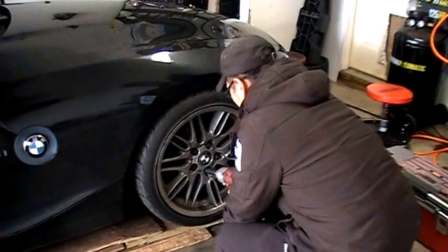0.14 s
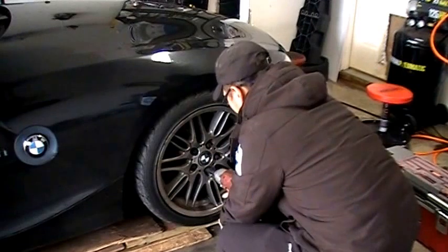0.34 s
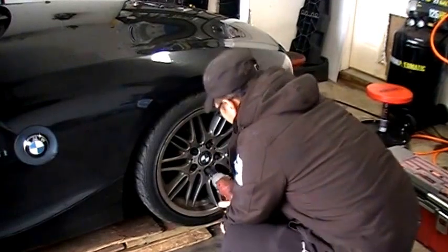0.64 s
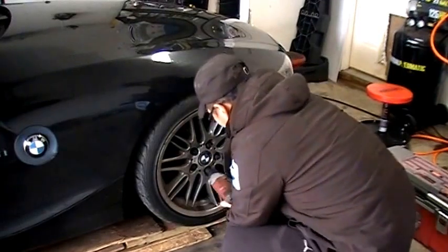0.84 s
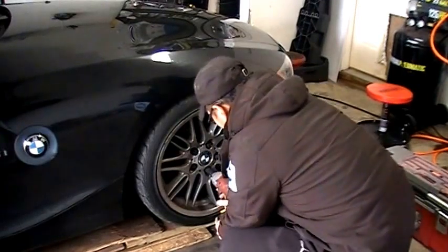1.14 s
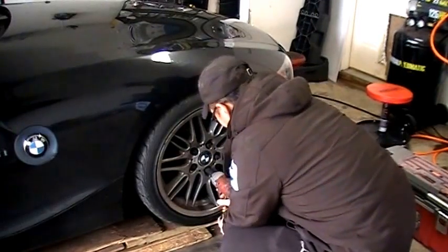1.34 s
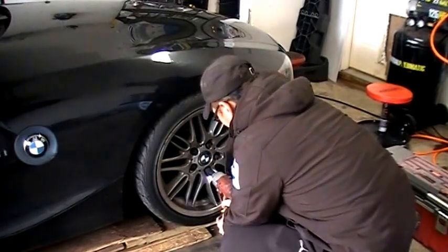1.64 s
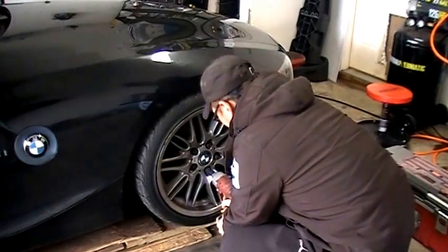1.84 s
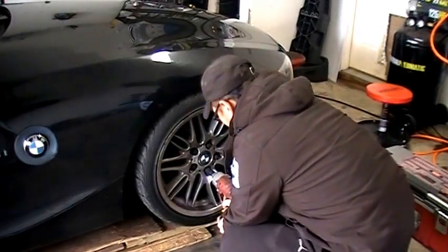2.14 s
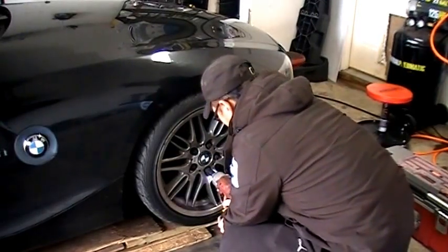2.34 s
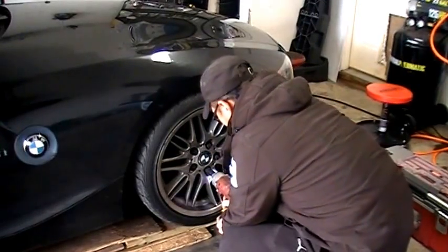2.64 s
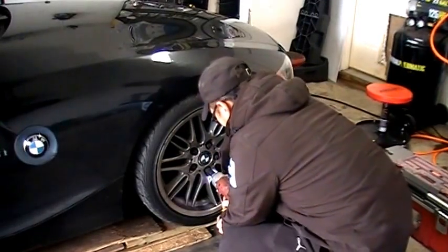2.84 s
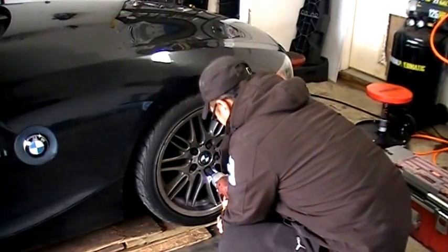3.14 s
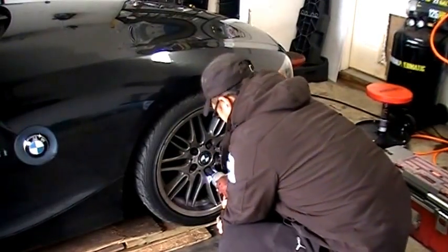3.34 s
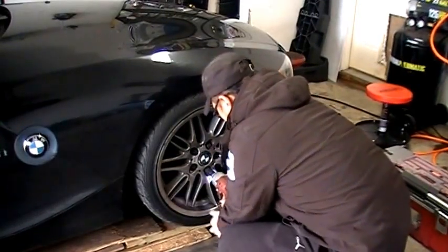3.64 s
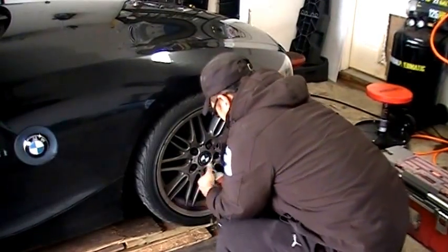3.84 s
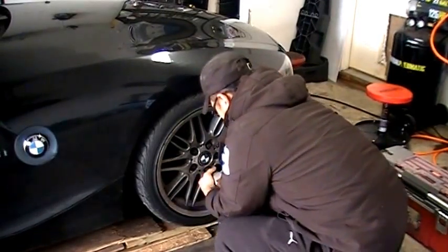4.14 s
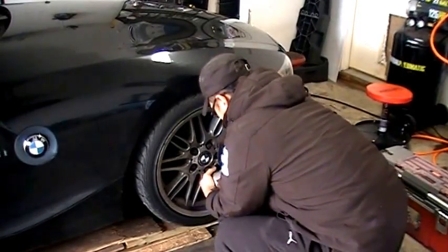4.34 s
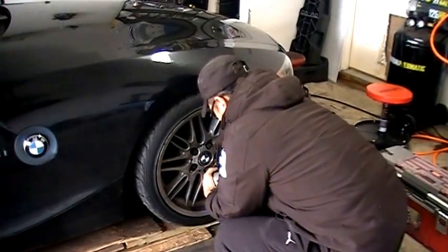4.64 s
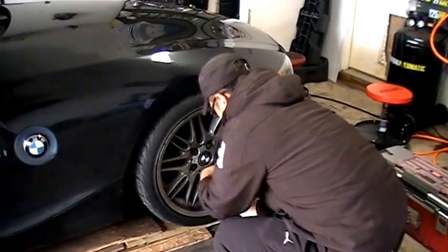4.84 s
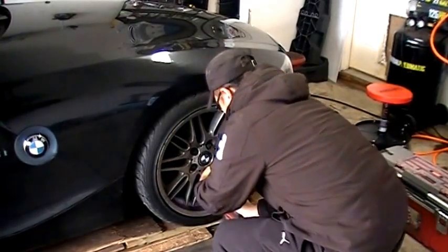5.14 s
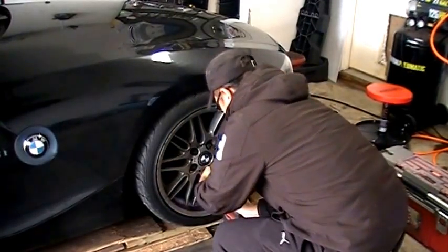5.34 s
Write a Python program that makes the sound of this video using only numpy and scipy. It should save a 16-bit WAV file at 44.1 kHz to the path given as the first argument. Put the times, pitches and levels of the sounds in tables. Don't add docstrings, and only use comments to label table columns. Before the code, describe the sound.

Small metallic knocks come first, in two clusters, followed by grainy jacket rustles and near quiet. Then a brief electric whistle leads into the harsh, continuous chatter of an impact wrench, about thirty-eight blows a second, with gear whirr and ringing wheel metal. The tool is close, echoing off the floor and car body with a short garage reverberation, captured in stereo by a microphone with automatic gain.

```python
import sys
import numpy as np
from scipy import signal
from scipy.fft import rfft, irfft, next_fast_len
from scipy.io import wavfile
from scipy.ndimage import map_coordinates

SR = 44100
rng = np.random.default_rng(int(sys.argv[2]) if len(sys.argv) > 2 else 0)


def file_out(sig):
    cols = np.atleast_2d(sig).T
    lim = np.clip(cols, -1, 1)
    pcm = np.round(lim * 32767).astype(np.int16)
    wavfile.write(sys.argv[1], SR, pcm)


def voltage_ratio(decibels):
    exponent = np.asarray(decibels, float) / 20
    return 10 ** exponent


N = 242991

# (time [s], crack [dB], wheel ring [dB], brightness [dB])
FIRST_BLOWS = [(1.5489, -6.5, -14, -1), (1.5826, -11, -14, 7), (1.6127, -15, -24, 14),
               (1.6381, -7.5, -22, -1.5), (1.6612, -9, -38, -2), (1.6831, -10.5, -14.5, 3),
               (1.7072, -10.5, -24, 3)]
# (time [s], blows struck so far [count])
BLOW_COUNT = [(1.7276, 7), (1.827, 11), (1.956, 16), (2.1611, 24), (2.5782, 40), (3.0473, 58), (3.2575, 66),
              (3.5209, 76), (3.9401, 92), (4.3577, 108), (4.7799, 124), (5.0142, 133), (5.4952, 151)]
# (time [s], level [dB])
FORCE = [(1.6, 2), (2.2, 1.5), (2.4, -1.7), (2.75, 1.1), (3.1, 0), (3.6, 0.2), (4.2, -0.3), (4.8, 0.3),
         (5.51, -0.45)]
# (time [s], level [dB])
GRIP = [(1.7, 1.5), (2.2, 0.5), (2.4, -2), (2.75, 0.5), (3.35, -0.6), (3.55, -3), (4.3, -0.5), (4.85, 3.5),
        (4.91, -5.5), (5.51, -4)]
# (blows per cycle [count], start [cycles], brightness [dB])
TONE_CYCLES = [(6.734, .14, 2.6), (7.53, -.41, 2.2)]
# (time [s], extra level [dB])
SQUARE_BLOWS = [(1.9293, 1.5), (1.9567, -1), (2.2632, 2.6), (2.3422, 1.8), (2.369, 1.8), (2.4469, 4),
                (2.5251, 3.2), (2.5786, 1), (2.629, 1.6), (2.709, 2.5), (3.073, 2), (3.2048, 3.5),
                (3.3096, 3.5), (3.5734, 3), (4.0172, 1), (4.0958, 3), (4.4627, 2), (4.5405, 1),
                (4.8325, 1.5), (4.882, 3), (4.9349, 1.8), (5.0143, 4), (5.0942, 2.5), (5.307, 1)]
# (frequency [Hz], level per Hz [dB])
CRACK_COLOUR = [(180, -10.5), (300, -18.5), (478, -20), (644, -15.5), (723, -17), (928, -22.5),
                (1930, -5.5), (2470, -7), (4810, -1.5), (10300, -14.5), (15900, -45)]

# (frequency [Hz], width [Hz], level [dB])
WHEEL = [(2353, 15, -23), (2708, 31, -5), (2870, 19, -14.5), (3206, 12, -18), (4310, 49, -17),
         (4810, 30, -3.5)]
# (frequency [Hz], width [Hz], level [dB])
SPOKES = [(1638, 29, -13), (1900, 23, -10), (1854, 185, -7), (1914, 23, -4), (2160, 65, -11.5)]
# (frequency [Hz], width [Hz], level [dB])
BARREL = [(657, 10, -1.5), (1126, 16, -6.5)]
# (time [s], level [dB])
BARREL_FREEDOM = [(1.5, 5), (1.7, 5.5), (2.2, 2), (2.7, 1), (3, 0.5), (3.4, 0), (3.8, 1.5), (4.2, -2.5),
                  (4.55, 5.5), (4.9, -10), (5.2, 1.5), (5.51, -4)]

# (frequency [Hz], level per Hz [dB])
WHIRR_COLOUR = [(59, -50), (100, -40), (153, -13.5), (460, -7), (646, -3.5), (927, -2.5), (1910, 3),
                (3450, -3), (4740, -2), (10400, -11.5), (15900, -37)]
# (frequency [Hz], width [Hz], level [dB])
SOCKET_TONES = [(1928, 18, -1), (4635, 60, -5), (4781, 30, -2), (4812, 16, 2)]
# (time [s], level [dB])
BODY_HUM = [(1.54, -127), (1.6, -57), (2.3, -50), (2.8, -49.5), (2.9, -43), (3.6, -45), (4.1, -48),
            (4.8, -39.5), (4.95, -50.5), (5.51, -49)]
# (multiple of the blow rate [ratio], level [dB])
SHAFT_TONES = [(3, -6), (4, 0), (5, -16), (6, -7), (11, -10), (14, -12)]
# (time [s], frequency [Hz], level [dB], length [s])
GROANS = [
    (1.545, 1500, -33, 0.0076),
    (1.576, 970, -19.5, 0.0037),
]

# (time [s], peak [dB], thud [dB], tick [dB])
KNOCKS = [(0.0004, -42, 8, -18), (0.0159, -22.5, -9, -4.5), (0.0129, -17, -11, -18),
          (0.0201, -29.5, 1, -19), (0.0291, -31.5, -5, -3), (0.0463, -34, -2, -11), (0.2229, -37, -1, -22),
          (0.239, -25.5, -4, -24), (0.244, -29.5, -4, -10), (0.2477, -15.5, -14.5, -16.5),
          (0.2545, -29, -19, -25), (0.2632, -18, -11.5, -34), (0.2698, -27.5, -4.5, -33),
          (0.2792, -20.5, -14, -27), (0.2968, -33, -9, -32), (0.7905, -36, -10, -8),
          (0.802, -30, -3.5, -20), (1.0987, -45, 2, -17), (1.483, -44, -11, -1.5)]
# (frequency [Hz], width [Hz], level [dB])
CLANK = [(1080, 540, -6), (1910, 390, 1), (2880, 810, -8)]

# (time [s], swish [dB], dull drag [dB], rise [dB/s], fall [dB/s])
SWISHES = [(0.021, -46.5, 23, 897, 200), (.09, -35, -5, 93, 80), (.5, -50.5, 1.5, 31, 41),
           (0.661, -28.5, -3.5, 650, 106), (.8, -46, -2, 200, 170), (.92, -66.5, 20.5, 100, 144),
           (1.18, -45.5, -8, 220, 260), (1.34, -59, -1.5, 43, 12)]
# (time [s], peak [dB])
CREASES = [(0.6315, -27), (0.648, -18), (0.652, -14), (0.7474, -29), (0.8505, -36), (0.9063, -34)]
# (frequency [Hz], level per Hz [dB])
SWISH_COLOUR = [(1470, -11), (2500, -8), (3130, -6), (3890, -9), (4430, -3.5), (7800, -1.5), (10100, -10.5),
                (15900, -33)]
# (frequency [Hz], level per Hz [dB])
DRAG_COLOUR = [(120, -59), (200, -24), (419, -1.5), (475, 0), (889, -2.5), (4000, -7), (5200, -39),
               (8800, -120)]

# (frequency [Hz], level per Hz [dB])
HUSH_COLOUR = [(12, -60), (20, -31), (113, -12), (284, -21), (356, -24), (432, -24), (919, -24),
               (1060, -24.5), (1180, -26.5), (2250, -32.5), (2730, -40.5), (8360, -39), (15900, -74)]
# (frequency [Hz], level per Hz [dB])
TRAFFIC_COLOUR = [(20, -40), (35, -18), (55, 14), (75, -20), (120, -56)]
# (frequency [Hz], level [dB])
FAR_HUM = [(102.3, -57), (220.7, -63), (355.3, -61)]

# (frequency [Hz], time to fall 60 dB [s])
GARAGE_DECAY = [(200, 0.98), (2000, 0.42), (6000, 0.94), (14000, .15)]
# (delay [ms], level [dB])
ECHOES = [
    (3.4, -8.5),
    (6.74, -13.5),
    (10.5, -29),
]
# (frequency [Hz], likeness [0 to 1])
ALIKE_NEAR = [(60, 1), (130, 0.74), (290, 0.65), (640, 0.91), (3100, 0.91), (6000, 0.95), (8500, 0.68),
              (11000, 0.55), (15000, 0.96)]
# (frequency [Hz], likeness [0 to 1])
ALIKE_FAR = [(60, 0.94), (240, 0.89), (950, 0.83), (3770, 0.81), (15000, 0.58)]
# (frequency [Hz], left minus right [dB])
LEAN = [(60, 3), (240, 3.5), (950, 3), (3770, 0.5), (15000, -0.5)]

JITTER_S = 0.0004
CRACK_DB, CRACK_SCATTER_DB = -12.5, 0.68
RING_DB, RING_LOSS_DB = -14.5, 2.5
BRIGHT_DB, BRIGHT_SCATTER_DB, SQUARE_DULL_DB = 2.5, 2.5, -3
TRIGGER_S, ENGAGE_S, SPIN_DB_PER_S = 1.49, 1.547, 550
WHIRR_DB, SURGE_DB, SURGE_S = -27.5, 7.5, 0.02
HUSH_DB = -55
DUCK_S, DUCK_DB, AGAIN_S, AGAIN_DB, DUCK_LAG_S = 1.596, -14, 2.87, -3.5, 0.021
TOP_HZ = 16000


def blows():
    when, count = np.transpose(BLOW_COUNT)
    n = np.arange(count[0], count[-1] + 1)
    luck = rng.standard_normal((len(n), 4))
    s = np.interp(n, count, when) + JITTER_S * luck[:, 3]
    tone_cycle = sum(size_db * np.cos(2 * np.pi * (n / turn + start)) for turn, start, size_db in TONE_CYCLES)
    extra_db = CRACK_SCATTER_DB * luck[:, 0]
    bright_db = BRIGHT_DB + tone_cycle + BRIGHT_SCATTER_DB * luck[:, 2]
    for at, square_db in SQUARE_BLOWS:
        k = np.argmin(abs(s - at))
        s[k], extra_db[k] = at, square_db
        bright_db[k] = BRIGHT_DB + SQUARE_DULL_DB + tone_cycle[k] / 2
    crack_db = CRACK_DB + np.interp(s, *np.transpose(FORCE)) + extra_db
    ring_db = RING_DB + np.interp(s, *np.transpose(GRIP)) - RING_LOSS_DB * luck[:, 1] ** 2
    return np.hstack([np.transpose(FIRST_BLOWS), [s, crack_db, ring_db, bright_db]])


def hammer():
    s, crack_db, ring_db, bright_db = blows()
    peak_ms = 1.8 * voltage_ratio(1.5 * rng.standard_normal(len(s)))
    dull = rattle(s, crack_db + 26.5 - 0.5 * bright_db, peak_ms, fall_ms=2.54, grit_db=2.5)
    sharp = rattle(s, crack_db + 34 + 0.5 * bright_db, 0.85 * peak_ms, fall_ms=2.4, grit_db=4.5)

    def colour(hz):
        return voltage_ratio(along(CRACK_COLOUR, hz))

    def high(hz):
        return 1 / (1 + (6500 / (hz + 1)) ** 6)

    low_crack = filtered(dull, lambda hz: colour(hz) * (1 - high(hz)))
    high_crack = filtered(sharp, lambda hz: colour(hz) * high(hz))

    jolt = np.zeros((2, N))
    jolt[:, np.round((s + 0.0008) * SR).astype(int)] = np.sign(rng.standard_normal((len(s), 2))).T
    ring_level = voltage_ratio(np.interp(np.arange(N) / SR, s, ring_db) + 41)
    spokes = filtered(jolt * ring_level, modes(SPOKES, sign=0.75))
    spokes = spokes + voltage_ratio(-4) * np.roll(spokes, round(0.00674 * SR), axis=1)
    spokes = filtered(spokes, modes([(2125, 1180, 0)]))
    barrel = filtered(jolt * voltage_ratio(curves(BARREL_FREEDOM)[0] + 20.0), modes(BARREL))
    wheel = voltage_ratio(8.5) * filtered(dull, modes(WHEEL))
    return low_crack + high_crack + spokes + barrel + wheel


def motor():
    t = np.arange(N) / SR
    (force_db,), (hum_db,), (grip_db,) = curves(FORCE), curves(BODY_HUM), curves(GRIP)
    spin_up_db = SURGE_DB + SPIN_DB_PER_S * (t - ENGAGE_S)
    settle_db = SURGE_DB * np.exp(-abs(t - ENGAGE_S) / SURGE_S)
    surge_db = np.where(t < ENGAGE_S, spin_up_db, settle_db)
    before_trigger_db = 900 * np.minimum(t - TRIGGER_S, 0)
    whirr_db = WHIRR_DB + force_db + surge_db + before_trigger_db
    whirr = voltage_ratio(whirr_db + 0.36 * wobble(30)) * hiss(WHIRR_COLOUR)

    wheel_noise = unit(filtered(rng.standard_normal((2, N)), modes(BARREL + SPOKES + WHEEL)))
    shake = voltage_ratio(whirr_db - 16.0 - 0.8 * abs(surge_db)) * wheel_noise
    socket_noise = unit(filtered(rng.standard_normal((2, N)), modes(SOCKET_TONES)))
    sing = voltage_ratio(whirr_db - 8 - 1.5 * abs(surge_db) + 0.4 * grip_db) * socket_noise

    turns = np.interp(t, *np.transpose([(FIRST_BLOWS[0][0], 0)] + BLOW_COUNT))
    hum = voltage_ratio(hum_db) * sum(voltage_ratio(db + 1.2 * wobble(5)) * np.sin(2 * np.pi * k * turns)
                            for k, db in SHAFT_TONES)
    whistle = voltage_ratio(-43) * np.sin(2 * np.pi * 5640 * t) + voltage_ratio(-60) * np.sin(4 * np.pi * 5640 * t)
    whistle = whistle * np.exp(-((t - 1.501) / 0.0078) ** 4)
    groan = sum(voltage_ratio(db) * np.exp(-((t - s) / life) ** 2) * np.sin(2 * np.pi * hz * t)
                for s, hz, db, life in GROANS)
    return whirr + shake + sing + (hum + whistle + groan) * [[1], [0.3]]


def socket():
    s, db, thud_db, tick_db = np.transpose(KNOCKS)
    ring = rattle(s, db + 31.5, 0.71, fall_ms=2.0, grit_db=-0.5)
    thud = rattle(s, db + thud_db + 37.5, 0.79, fall_ms=1.6, grit_db=3.5)
    tick = rattle(s, db + tick_db + 17.5, 0.51, fall_ms=1.8, grit_db=-10.5)
    ring = filtered(ring, modes(CLANK))
    thud = filtered(thud, modes([(180, 93, 1.2), (345, 43, 1.2), (657, 144, 0)]))
    tick = filtered(tick, modes([(4230, 1700, 16.0), (8000, 5000, -14)]))
    return filtered(ring + thud + tick, lambda hz: 1 / (1 + (hz / 9000) ** 4))


def jacket():
    t = np.arange(N) / SR
    swish, drag = 0, 0
    for s, db, drag_db, rise, fall in SWISHES:
        slide = voltage_ratio(db + np.minimum(rise * (t - s), fall * (s - t)))
        swish = swish + slide
        drag = drag + slide * voltage_ratio(drag_db)
    grain = voltage_ratio(0.83 * wobble(330) + 1.9 * wobble(41.3))
    cloth = swish * hiss(SWISH_COLOUR) + voltage_ratio(-2.5) * drag * hiss(DRAG_COLOUR)
    s, db = np.transpose(CREASES)
    snaps = rattle(s, db + 14.5, 0.3, fall_ms=0.9, grit_db=8.0)
    snaps = filtered(snaps, lambda hz: voltage_ratio(along(SWISH_COLOUR, hz)))
    return voltage_ratio(-3.0) * grain * cloth + snaps


def street():
    t = np.arange(N) / SR
    gain_db = sum(db / 2 * (1 + np.tanh((t - s) / DUCK_LAG_S))
                  for s, db in [(DUCK_S, DUCK_DB), (AGAIN_S, AGAIN_DB)])
    hush = voltage_ratio(8.5 + 3.2 * wobble(9.6)) * hiss(HUSH_COLOUR)
    traffic = voltage_ratio(-11.0 + 4.8 * wobble(5.9)) * hiss(TRAFFIC_COLOUR)
    hum = sum(voltage_ratio(db + 2.2 * wobble(5.84)) * np.sin(2 * np.pi * hz * t) for hz, db in FAR_HUM)
    return voltage_ratio(gain_db) * (voltage_ratio(HUSH_DB) * (hush + traffic) + hum * [[1.4], [0.3]])


def garage(x, wet_db):
    block = 8192
    tails = np.zeros((2, N + SR))
    for start in range(0, N, block):
        hz, t, z = signal.stft(rng.standard_normal((2, SR // 3)), SR, nperseg=256)
        fade = voltage_ratio(-60 * t / along(GARAGE_DECAY, hz)[:, None])
        tail = signal.istft(z * fade, SR, nperseg=256)[1]
        tail = tail / np.linalg.norm(tail[0])
        wet = signal.fftconvolve(x[:, start:start + block], tail, axes=1)
        late = start + 300
        tails[:, late:late + wet.shape[1]] += wet

    def echoes(hz):
        return 1 + sum(voltage_ratio(db) * np.exp(-2j * np.pi * hz * ms / 1000) for ms, db in ECHOES)

    return filtered(x, echoes) + voltage_ratio(wet_db) * tails[:, :N]


def ports(pair, alike):
    def share(hz):
        angle = np.arccos(np.clip(along(alike, hz), -1, 1)) / 2
        return np.array([np.cos(angle), np.sin(angle)])

    mid, side = filtered(pair, share)
    both = np.array([mid + side, mid - side])
    return filtered(both, lambda hz: voltage_ratio(along(LEAN, hz) * np.array([[0.5], [-0.5]])))


def rattle(times, db, peak_ms, fall_ms, grit_db):
    length = 700
    ms = np.arange(length)[None] * 1000 / SR
    peak_ms = np.reshape(peak_ms, (-1, 1))
    shape = np.where(ms < peak_ms, 0.5 + 0.5 * ms / peak_ms, np.exp((peak_ms - ms) / fall_ms))
    noise = rng.standard_normal((len(times), 3, length))
    chatter = noise[:, :2] * (voltage_ratio(grit_db * noise[:, 2]) * shape)[:, None]
    chatter *= voltage_ratio(db)[:, None, None] / np.linalg.norm(chatter, axis=2, keepdims=True)
    starts = np.round(np.asarray(times) * SR).astype(int)
    where = (starts[:, None] + np.arange(length)).ravel()
    return np.array([np.bincount(where, chatter[:, k].ravel(), N + length)[:N] for k in range(2)])


def modes(rows, sign=-1):
    def response(f):
        total = 0
        for k, (centre, width, db) in enumerate(rows):
            loss = 1j * f * width
            total = total + sign ** k * voltage_ratio(db) * loss / (centre * centre - f * f + loss)
        return total

    return response


def hiss(spectrum):
    return unit(filtered(rng.standard_normal((2, N)), lambda hz: voltage_ratio(along(spectrum, hz))))


def filtered(x, response):
    m = next_fast_len(N + SR // 2)
    return irfft(rfft(x, m) * response(np.fft.rfftfreq(m, 1 / SR)), m)[..., :N]


def wobble(rate):
    return map_coordinates(rng.standard_normal(int(N * rate / SR) + 4), [np.arange(N) * rate / SR])


def curves(rows):
    s, *cols = np.transpose(rows)
    return [np.interp(np.arange(N) / SR, s, c) for c in cols]


def along(points, hz):
    f, v = np.transpose(points)
    return np.interp(np.log(hz + 1), np.log(f + 1), v)


def unit(x):
    return x / np.sqrt(np.mean(x ** 2) + 1e-20)


def scene():
    wrench = garage(hammer(), wet_db=-4.5) + motor()
    wrench = filtered(wrench, lambda hz: 1 / (1 + (130 / (hz + 1)) ** 8))
    around = garage(socket(), wet_db=-3.0) + jacket() + street()
    return ports(wrench, ALIKE_NEAR) + ports(around, ALIKE_FAR)


def band_limit(x):
    return signal.sosfilt(signal.butter(12, 16040, fs=SR, output="sos"), x)


def record(dry):
    soft = dry / (1 + np.abs(dry / 0.8) ** 4) ** (1 / 4)
    mix = filtered(soft, lambda hz: hz < TOP_HZ)
    return band_limit(mix)


dry = scene()
out = record(dry)
file_out(out)
```